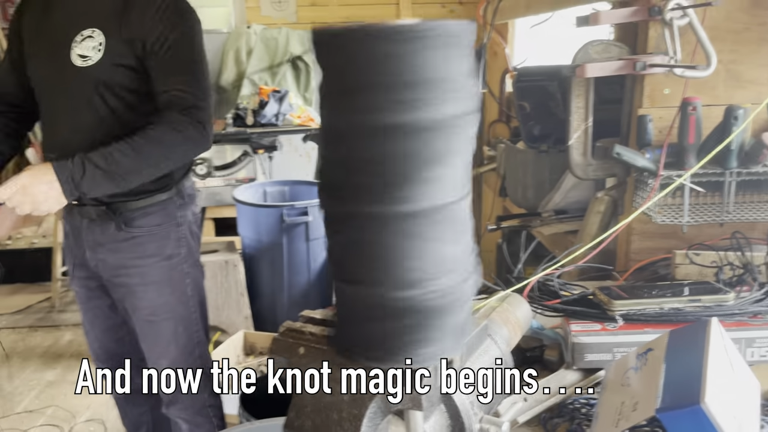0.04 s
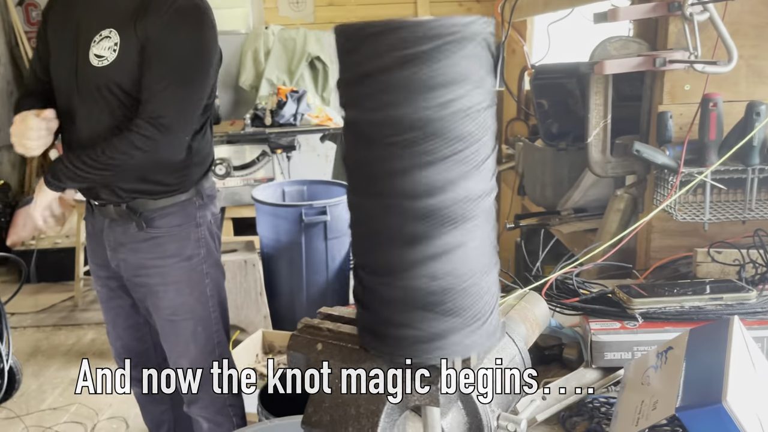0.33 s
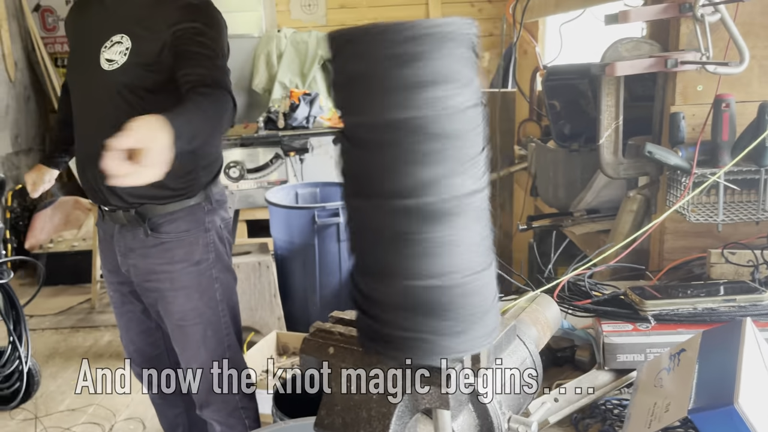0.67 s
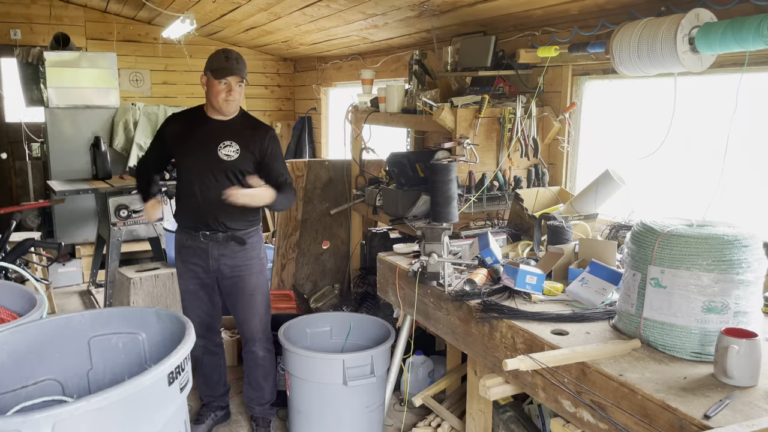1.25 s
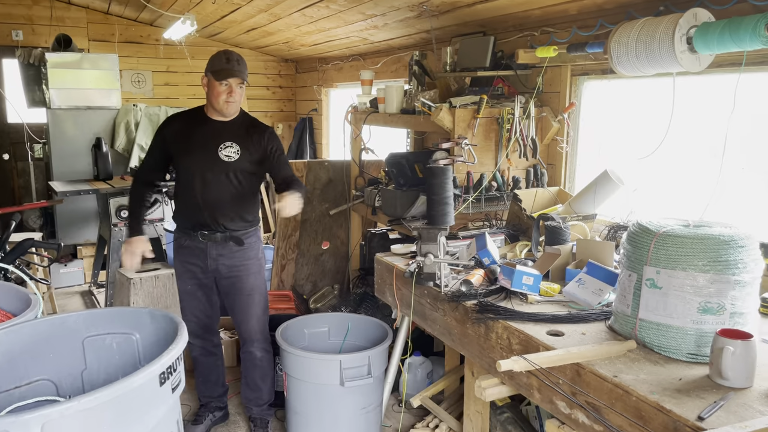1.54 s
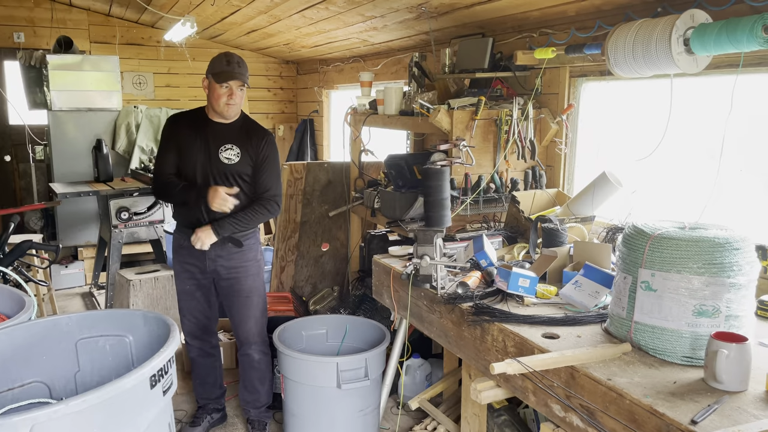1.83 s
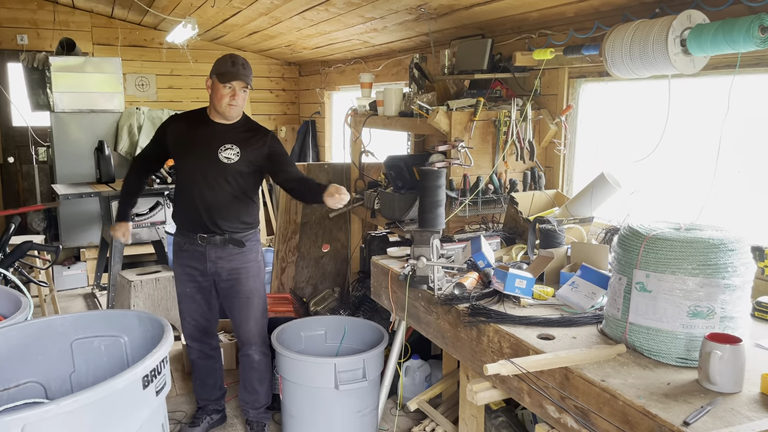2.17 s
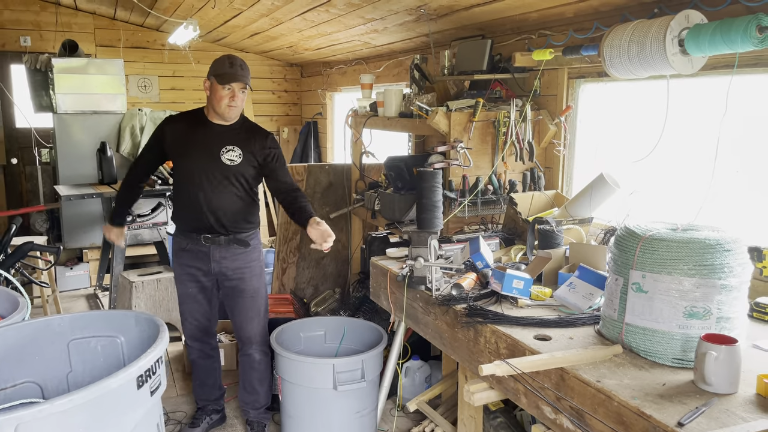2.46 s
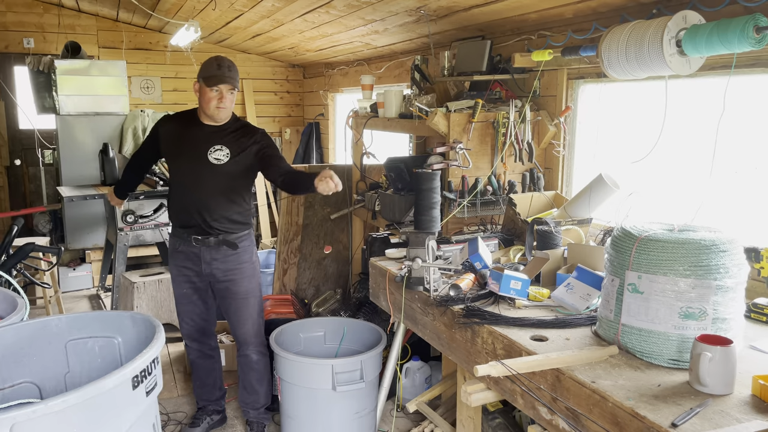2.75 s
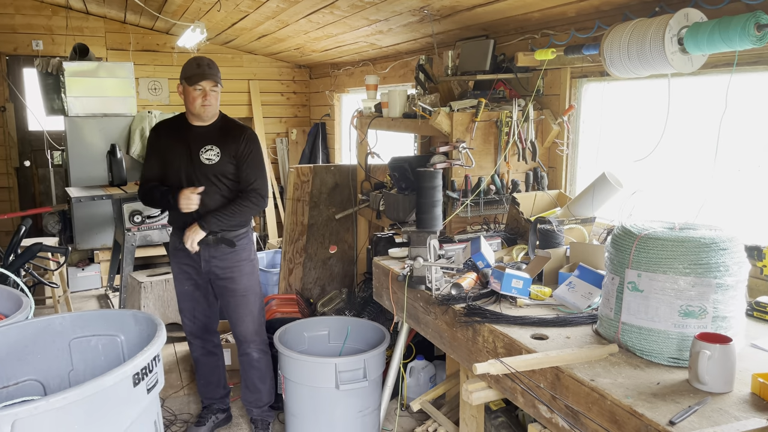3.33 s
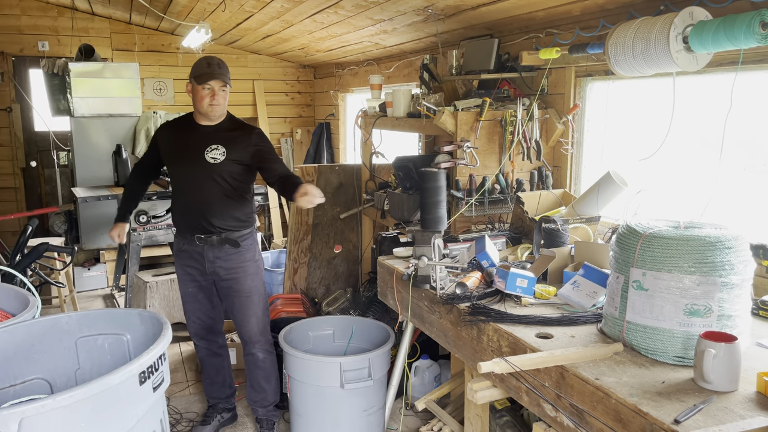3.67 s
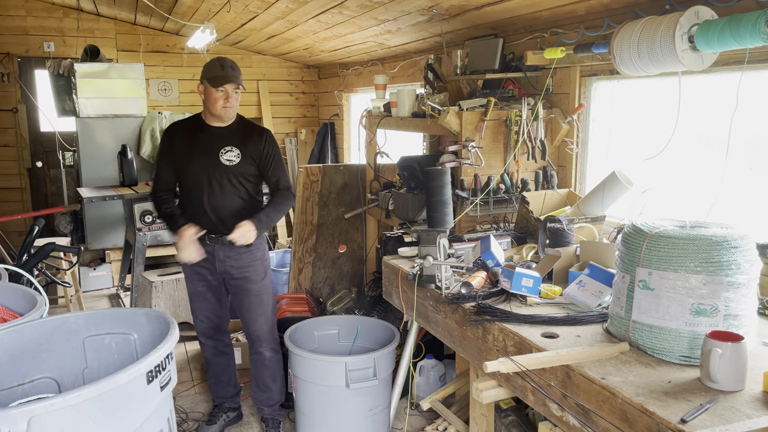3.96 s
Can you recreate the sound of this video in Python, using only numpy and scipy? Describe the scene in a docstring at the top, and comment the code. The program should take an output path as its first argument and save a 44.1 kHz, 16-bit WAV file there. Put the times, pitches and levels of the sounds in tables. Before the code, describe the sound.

A spool knocks and rattles unevenly on its spindle, over low workbench rumble and faintly hissing line. A loud, close slam with a metallic buzz and clink comes at 0.1 seconds, followed by knocks and ticks. From about 1.2 seconds the knocking is heard from across the small workshop. A knock with a buzzing scrape lands at 2.3 seconds; after a lull, knocks crowd together from 3 seconds with faint clinks.

```python
"""A tall spool wobbles on a spindle clamped to a wooden workbench as its line is pulled off by hand.
Its impacts excite the damped modes of spool and bench: it knocks, slams, rattles and scrapes, and the
bench rumbles in its lowest mode. Friction makes the running line hiss and tick, hard knocks set loose
metal buzzing, and a tool clinks. It is heard from beside the spool, then, after a short click, from
across the small workshop."""
import sys
import numpy as np
from scipy import signal
from scipy.io import wavfile
from scipy.ndimage import uniform_filter1d

SR = 44100
rng = np.random.default_rng(int(sys.argv[2]) if len(sys.argv) > 2 else 0)


def unload_wav(signal):
    """Save mono or channel-first audio to the path in sys.argv[1] as 16-bit WAV at rate SR, clipped to [-1, 1]."""
    wavfile.write(
        sys.argv[1],
        SR,
        np.round(np.clip(np.atleast_2d(signal).T, -1, 1) * 32767).astype(np.int16),
    )


N = 176400
TIME = np.arange(N) / SR
BAND_HZ = 80 * 2 ** (np.arange(24) / 3)
MOVE_S = 1.245  # the listening point changes from near to far

# The spool knocks on its spindle. Each row: start in seconds, boom, clunk and crack levels in dB,
# pitch of the hollow ring in Hz, contact time in seconds. Levels in all tables are relative.
KNOCKS = [(0.048, -35, -28, -39, 455, 0.00051), (0.09, -15, -14.5, -22, 446, 0.002),
          (0.161, -16.5, -15, -27.5, 630, 0.0052), (0.286, -21, -27, -37, 370, 0.013),
          (.398, -21.5, -22, -39, 525, 0.0012), (0.484, -30, -30.5, -34.5, 1000, 0.005),
          (.5215, -20.5, -17.5, -36.5, 690, 0.0026), (0.771, -27.5, -30.5, -44, 519, 0.00805),
          (1.013, -19.5, -26.5, -38.5, 427, 0.0063), (1.067, -30, -32, -52, 390, 0.0091),
          (1.115, -20, -35, -56, 545, 0.0023), (1.192, -20.5, -25.5, -37.5, 510, 0.0022),
          (1.387, -20.5, -22.5, -37, 549, 0.0053), (1.45, -27, -28, -71, 583, 0.01),
          (1.583, -27, -36.5, -45, 600, 0.0013), (1.623, -22, -25, -50, 603, 0.0041),
          (1.69, -29.5, -28, -70, 460, 0.0058), (1.759, -30, -33, -73, 427, 0.0069),
          (1.876, -29, -25.5, -59, 650, 0.02), (2.159, -30, -28.5, -41, 630, 0.0027),
          (2.273, -26, -24, -39, 488, 0.013), (2.325, -16.5, -24, -31.5, 300, 0.0096),
          (2.473, -41.5, -45, -46, 456, 0.0052), (2.675, -42, -44, -46, 490, 0.0073),
          (2.953, -24.5, -32, -75, 405, 0.011), (3.059, -25, -25, -38.5, 844, 0.0014),
          (3.085, -16, -20.5, -33.5, 604, 0.01205), (3.127, -23, -19.5, -39, 607, 0.0097),
          (3.225, -18, -21.5, -37, 497, 0.0026), (3.299, -24.5, -31, -55, 513, 0.0016),
          (3.384, -23, -25, -41, 506, 0.0023), (3.432, -20.5, -22, -42, 510, 0.015),
          (3.467, -18.5, -19.5, -36, 644, 0.002), (3.493, -20.5, -23, -43, 838, 0.0079),
          (3.585, -24.5, -31.5, -41, 387, 0.0061), (3.634, -23, -23, -38.5, 770, 0.0044),
          (3.712, -19, -19, -31, 520, 0.0058), (3.739, -17, -25, -50, 490, 0.0092),
          (3.92, -22.5, -32, -61, 460, 0.012), (3.974, -26, -33, -64, 447, 0.0086)]
BOOM_HZ, CLUNK_HZ, CRACK_HZ = 217, 520, 1400  # where the three levels apply
HARD_CONTACT_S = 0.00072  # shorter contacts give a full, sharp clack
# Modes of spool and bench. Each row: frequency in Hz, near level in dB, far level in dB, t60 in seconds.
WOOD_MODES = [(101.3, -1, -4.5, 0.16), (172, -4, -4.5, 0.11), (297.6, 6.5, 1.5, 0.17),
              (312, -2.5, -7, 0.17), (454, -6, -13, 0.1), (481, -3.5, -2.5, 0.15), (547, -11, -7.5, 0.094),
              (600, -3, -15, 0.03), (779, 1, -5.5, 0.07), (834, -7.5, -20, 0.18), (990, -21, -19, .08),
              (1153.5, -17, -10, 0.11), (1710, -5, -26, 0.1), (1864, 3.5, -9, 0.08),
              (2312, 3.5, -14.5, 0.041)]
MODE_SPREAD_DB = 2.5  # each blow strikes the modes a little differently
# Spectrum of the contact clack. Each row: frequency in Hz, band level in dB.
CLACK_SPECTRUM = [(300, -40), (520, -8), (780, 15.5), (1100, -27), (2200, 9), (3200, -45), (5500, -26),
                  (9000, -36), (14000, -35)]
# Dense ringing of bench, clutter and room. Each row: frequency in Hz, band level in dB.
CLATTER_SPECTRUM = [(90, -6.5), (160, -3.5), (240, -7.5), (330, -5.5), (500, -2.5), (750, -7.5), (1100, -4),
                    (2000, -9.5), (3500, -11), (7000, -14.5), (10000, -5.5), (13000, -42)]
# Decay of that ringing. Each row: frequency in Hz, nominal t60 in seconds.
CLATTER_DECAY = [(120, 0.24), (300, 0.22), (600, 0.23), (1500, 0.26), (8000, 0.19)]
# The spool slams on the bench and rebounds. Each row: start in seconds, level in dB, final pitch in Hz.
SLAM_BLOWS = [(.092, -0.5, 453), (.0968, -13.5, 613), (.1015, -25, 436), (.1068, -10, 305),
              (.1148, -10, 320)]
# Strength of the rattle at the spindle. Each row: time in seconds, level in dB.
RATTLE_LEVEL = [(0, -20.5), (.35, -31), (.56, -27), (.65, -31), (.92, -35), (1.1, -33.5), (1.3, -36),
                (1.5, -27), (1.72, -29), (2.08, -35.5), (2.4, -29), (2.6, -42.5), (2.85, -39), (3.02, -34),
                (3.15, -31.5), (3.6, -26.5), (3.85, -39), (4, -22)]
# The spool's rim scrapes. Each row: start in seconds, rise time in seconds, level in dB.
SCRAPES = [(2.333, 0.01, -26.5), (3.095, 0.027, -45), (3.713, .012, -38.5)]
# Spectrum of the scraping. Each row: frequency in Hz, band level in dB.
SCRAPE_SPECTRUM = [(200, -6), (300, -8), (450, -12), (700, -14), (1400, -22.5), (2400, -9.5), (3600, -19.5),
                   (5000, -9.5), (7000, -18), (10000, -21), (13000, -45)]
# Bench rumble heard near. Each row: time in seconds, frequency in Hz, level in dB.
RUMBLE_NEAR = [(0.0, 61.4, -14.5), (0.064, 64.15, -19), (0.226, 63, -19.5), (0.306, 63.8, -32),
               (0.33, 62.5, -25.5), (0.472, 67.3, -23), (0.61, 60.9, -29), (0.7, 72.6, -24.5),
               (0.738, 68.8, -17), (0.838, 68.4, -30.5), (0.856, 70.64, -44), (0.9, 71.4, -26),
               (1.05, 72.5, -23.5), (1.18, 66.8, -31.5), (1.214, 71.6, -16.5), (1.24, 68, -19)]
# Bench rumble heard far. Each row: time in seconds, level in dB.
RUMBLE_FAR = [(1.26, -38), (1.33, -31.5), (1.41, -25.5), (1.51, -22.5), (1.56, -35), (1.645, -27),
              (1.72, -29), (1.82, -45), (1.94, -23.5), (2, -36), (2.12, -40.5), (2.21, -22), (2.3, -30.5),
              (2.365, -23), (2.47, -30), (2.6, -41.5), (2.83, -37.5), (2.96, -26.5), (3.08, -27.5),
              (3.17, -21), (3.27, -22), (3.33, -28.5), (3.5, -25.5), (3.59, -34.5), (3.75, -21),
              (3.82, -31.5), (4, -23)]
# Strength of the running line's hiss. Each row: time in seconds, level in dB.
HISS_LEVEL = [(0.0, -44.5), (0.2, -46.5), (0.78, -47), (1.08, -48.5), (1.38, -46), (1.53, -49.5),
              (1.96, -48), (2.29, -49.5), (2.47, -50), (2.9, -48.5), (3.11, -47), (3.52, -47), (4.0, -48.5)]
# Spectrum of the hiss. Each row: frequency in Hz, band level in dB.
HISS_SPECTRUM = [(300, -35), (700, -17), (1300, -10), (2400, -8.5), (3500, -13), (5000, -12), (7000, -10),
                 (9000, -8.5), (11500, 0), (13000, -36), (15000, -48)]
# Short ticks: the one at 1.242 s is a click as the sound cuts from near to far; the rest are the line's.
# Each row: start in seconds, level in dB.
TICKS = [(0.029, -36), (0.078, -41), (0.1293, -18.5), (0.137, -19), (0.172, -33), (0.232, -44),
         (0.247, -32.5), (0.381, -36), (0.411, -29.5), (0.472, -29), (.489, -27.5), (0.517, -37),
         (0.564, -31), (0.626, -34), (0.641, -41), (.673, -45), (0.712, -39), (.717, -39), (0.732, -60),
         (0.904, -40.5), (0.932, -39), (.949, -37), (0.956, -57), (0.977, -34), (1.0, -46), (1.009, -50),
         (1.031, -41), (1.051, -41), (1.085, -43), (1.104, -44), (1.118, -39), (1.13, -34.5), (1.157, -48),
         (1.193, -55), (1.207, -54), (1.242, -47), (1.829, -43.5), (2.086, -43.5), (2.97, -43),
         (3.653, -48), (3.931, -37)]
# Spectrum of a tick. Each row: frequency in Hz, band level in dB.
TICK_SPECTRUM = [(1200, -31), (3000, -17), (5000, -4.5), (7000, -13), (9000, -1), (11500, 10), (15000, -24)]
# Loose metal buzzes after hard knocks. Each row: start in seconds, level in dB.
BUZZES = [(.096, -23.5), (2.329, -28), (2.338, -25), (3.711, -35.5)]
# Modes of the loose metal. Each row: frequency in Hz, level in dB, t60 in seconds.
METAL_MODES = [(5000, -18, .1), (8260, -9, 0.23), (8280, -1.5, 0.15), (8430, 7, 0.055), (8830, 1.5, 0.04),
               (9050, 0.5, 0.062)]
# A tool clinks on the bench. Each row: start in seconds, level in dB.
CLINKS = [(0.1303, -23.5), (3.113, -45), (3.182, -48.5), (3.386, -43.5), (3.448, -46), (3.476, -58),
          (3.653, -39.5), (3.746, -40)]
# Modes of the tool. Each row: frequency in Hz, level in dB, t60 in seconds.
TOOL_MODES = [(2800, 1.5, 0.026), (3050, 1, .04), (4050, -5, 0.15), (3950, -8, 0.039), (5200, -9, 0.05),
              (6320, -4, 0.037)]
# Reflections off clutter and walls. Each row: delay in seconds, gain as a ratio.
ECHOES = [(.0031, 0.12), (.0057, -0.1), (.0089, -0.045), (0.0135, -0.079), (0.0221, 0.0051)]
# Likeness of left and right. Each row: frequency in Hz, correlation coefficient.
COHERENCE = [(60, 0.72), (120, 1), (380, 0.76), (700, 0.59), (1300, 0.2), (4400, 0.34), (7000, 0.29),
             (8800, 0.36), (12000, 0.28)]


def knocks(rows, bands, near, blow_db, clack_db, hollow_t60, modes_db, clatter_db, decay_scale):
    """Impact excitation: wood rings and clatters; longer contact weakens the hollow blow and the clack."""
    starts, _, clunk_db, _, hollow_hz, contact_s = rows.T
    contact_s = np.maximum(contact_s, 1 / SR)
    soft_db = -10 * np.log10(1 + contact_s / HARD_CONTACT_S)
    out = np.zeros((2, N))
    for start, db, hz in zip(starts, clunk_db + soft_db + blow_db, hollow_hz):
        out += ring(impulses(np.array([start]), from_db([db])), hz, hollow_t60)
    for k, (hz, near_db, far_db, t60) in enumerate(WOOD_MODES):
        db = knock_db(rows, hz) + (near_db if near else far_db) + modes_db
        heights = from_db(db + rng.normal(0, MODE_SPREAD_DB, len(rows)))
        strikes = impulses(starts + contact_s * rng.random(len(rows)), heights)
        out += (-1) ** k * ring(strikes, hz, t60)
    return out + clatter(rows, bands, contact_s, soft_db, clack_db, clatter_db, decay_scale)


def clatter(rows, bands, contact_s, soft_db, clack_db, clatter_db, decay_scale, build_cycles=1.63):
    """Modal overlap: after each clack, crowded modes swell and decay as noise, low bands swelling last."""
    age = TIME[:SR // 2]
    out = np.zeros((2, N))
    for hz, band in zip(BAND_HZ, bands):
        t60 = decay_scale * at_hz(CLATTER_DECAY, hz)
        tail = from_db(at_hz(CLATTER_SPECTRUM, hz) + clatter_db) ** 2 * np.exp(-2 * np.log(1000) * age / t60)
        clack = from_db(at_hz(CLACK_SPECTRUM, hz) + clack_db) ** 2 * np.exp(-age / 0.0006)
        power = np.zeros(N + len(age))
        for start, contact, db, soft in zip(rows[:, 0], contact_s, knock_db(rows, hz), soft_db):
            swell = 1 - np.exp(-age / (contact + build_cycles / hz))
            burst = tail * swell + clack * from_db(soft) ** 2
            power[int(start * SR):][:len(age)] += from_db(db) ** 2 * burst
        out += band * np.sqrt(power[:N])
    return out


def knock_db(rows, hz):
    """Excitation spectrum: the level of each knock at one frequency."""
    return np.array([at_hz([(BOOM_HZ, boom), (CLUNK_HZ, clunk), (CRACK_HZ, crack)], hz)
                     for boom, clunk, crack in rows[:, 1:4]])


def slam(lead_hz=810, sweep_s=0.00094, first_t60=0.039, rebound_t60=0.018):
    """Dispersion: treble runs ahead through the bent board, so the blow and its rebounds drop in pitch."""
    out = np.zeros(N)
    for k, (start, db, hz) in enumerate(SLAM_BLOWS):
        age = np.maximum(TIME - start, 0)
        cycles = hz * age + lead_hz * sweep_s * (1 - np.exp(-age / sweep_s))
        decay = np.exp(-np.log(1000) * age / (rebound_t60 if k else first_t60))
        out -= from_db(db) * np.sin(2 * np.pi * cycles) * decay
    return out


def rattle(bands, tilt_db_per_octave=-7.5):
    """Random excitation: small contacts at the spindle keep the wood ringing, duller than the knocks."""
    def dull_db(hz):
        return tilt_db_per_octave * np.maximum(np.log2(hz / BOOM_HZ), 0)

    contacts = grains(per_s=140, spread_db=7.5)
    wood = sum((-1) ** k * from_db(db + dull_db(hz)) * ring(contacts, hz, t60)
               for k, (hz, _, db, t60) in enumerate(WOOD_MODES))
    wash = sum(band * from_db(at_hz(CLATTER_SPECTRUM, hz) + dull_db(hz))
               for hz, band in zip(BAND_HZ, bands))
    level = from_db(in_time(RATTLE_LEVEL)[0])
    return level * (from_db(-6.5) * unit_rms(wood) + from_db(-3) * unit_rms(wash))


def scrapes(bands, slip_s=0.0014, wood_db=-5):
    """Stick-slip friction: the rim rubs in tiny slips, each a puff of grit and a push on the wood."""
    pressure = np.zeros(N)
    for start, rise_s, db in SCRAPES:
        progress = np.maximum(TIME - start, 0) / rise_s
        pressure += from_db(db) * progress * np.exp(1 - progress)
    slips = grains(per_s=700, spread_db=3.5)
    slip_power = signal.lfilter([1], [1, -np.exp(-1 / (slip_s * SR))], slips ** 2)
    grit = sum(band * from_db(at_hz(SCRAPE_SPECTRUM, hz)) for hz, band in zip(BAND_HZ, bands))
    wood = sum(from_db(db + wood_db) * ring(slips * pressure, hz, t60) for hz, _, db, t60 in WOOD_MODES)
    return pressure * unit_rms(np.sqrt(slip_power)) * grit + wood


def bench_rumble(hz, db, wander_hz, flutter_db, shudder_db):
    """Forced vibration: the bench's lowest mode is shaken unevenly, with a looser shudder beneath it."""
    phase = 2 * np.pi * np.cumsum(hz + wander_hz * drift(rate_hz=16.8)) / SR
    shudder = unit_rms(bandpass(rng.standard_normal(N + SR), 51, 62)[SR:])
    mode = np.sqrt(2) * np.sin(phase) * from_db(flutter_db * drift(rate_hz=39))
    return (mode + from_db(shudder_db) * shudder) * from_db(db)


def running_line(bands, near, far_dull_db=-3, near_rustle_db=-6, far_rustle_db=-17, bunch_db=3):
    """Friction noise: the line hisses, ticks and rustles in bunches; one click marks the cut to far."""
    starts, db = np.transpose(TICKS)
    ticks = hit_envelope(starts, db, t60=0.018, rise_s=0.00032)
    ticks += hit_envelope(starts, db - 15.5, t60=0.11, rise_s=0.0037)  # faint tails
    run = from_db(in_time(HISS_LEVEL)[0])
    hiss = run * from_db(2 + drift(rate_hz=20))
    dulled = hiss * from_db(np.where(near, 0, far_dull_db))
    out = np.zeros((2, N))
    for hz, band in zip(BAND_HZ, bands):
        out += band * (dulled if hz > 9000 else hiss) * from_db(at_hz(HISS_SPECTRUM, hz))
        if hz > 1000:
            out += band * ticks * from_db(at_hz(TICK_SPECTRUM, hz))
    centre = grains(per_s=1400, spread_db=7)
    sides = np.array([grains(per_s=1400, spread_db=6.5) for _ in range(2)])
    fibres = echoed(centre + sides) * from_db(bunch_db * drift(rate_hz=35))
    rustle = unit_rms(bandpass(fibres, 2500, 10500))
    return out + rustle * run * from_db(np.where(near, near_rustle_db, far_rustle_db))


def loose_metal():
    """Contact chatter: a shaken metal part strikes rapidly for a moment and rings in its high modes."""
    shaken = hit_envelope(*np.transpose(BUZZES), t60=0.062, rise_s=0.0013)
    chatter = [grains(per_s=1500, spread_db=5) * shaken for _ in range(2)]
    mid, side = sum(from_db(db - 25) * ring(chatter, hz, t60) for hz, db, t60 in METAL_MODES)
    return mid + from_db(-10) * side * np.array([[1], [-1]])


def tool_clinks(max_bounce_s=0.012, bounce_loss_db=18):
    """Free vibration: a tool rings after each touch of metal on metal and its two quick bounces."""
    touches = [(start + k * max_bounce_s * rng.uniform(0.25, 0.99), db - k * bounce_loss_db)
               for start, db in CLINKS for k in range(3)]
    starts, db = np.transpose(touches)
    out = np.zeros(N)
    for hz, mode_db, t60 in TOOL_MODES:
        heights = from_db(db + mode_db + rng.normal(0, MODE_SPREAD_DB, len(starts)))
        out += ring(impulses(starts, heights), hz, t60)
    return out


def echoed(x):
    """Early reflections: the workshop adds weak, delayed copies of a sound."""
    out = x.copy()
    for delay_s, gain in ECHOES:
        lag = max(int(delay_s * SR), 1)
        out[..., lag:] += gain * x[..., :-lag]
    return out


def noise_bands():
    """Partial coherence: third-octave bands of noise of rms 1, partly alike in left and right."""
    white, bands = echoed(rng.standard_normal((2, 2, N))), []
    for k, hz in enumerate(BAND_HZ):
        mid, side = bandpass(white[k % 2], hz / 1.13, hz * 1.13)  # adjacent bands are independent
        alike = np.clip(at_hz(COHERENCE, hz), -1, 1)
        bands.append(unit_rms(np.sqrt(1 + alike) * mid + np.sqrt(1 - alike) * side * [[1], [-1]]))
    return bands


def ring(x, hz, t60):
    """Damped resonator: a unit impulse starts a decaying sine of height 1."""
    r, w = np.exp(-np.log(1000) / (t60 * SR)), 2 * np.pi * hz / SR
    return signal.lfilter([0, np.sin(w)], [1, -2 * r * np.cos(w), r * r], x)


def hit_envelope(starts, db, t60, rise_s):
    """Exponential decay: the amplitude of hits whose energy swells and dies away."""
    fall, rise = np.exp(-2 * np.log(1000) / (t60 * SR)), np.exp(-1 / (rise_s * SR))
    energy = signal.lfilter([1], [1, -fall], impulses(starts, from_db(db) ** 2))
    return np.sqrt(signal.lfilter([1 - rise], [1, -rise], energy))


def impulses(starts, heights):
    """Impulse train: one click at each start."""
    return np.bincount(np.clip(starts * SR, 0, N - 1).astype(int), heights, N) + 1e-18


def grains(per_s, spread_db):
    """Shot noise: random clicks of uneven size and sign."""
    sizes = from_db(spread_db * np.minimum(rng.exponential(1, N), 4)) * rng.choice([-1, 1], N)
    return sizes * (rng.random(N) < per_s / SR) + 1e-18


def drift(rate_hz, step=40):
    """Low-passed noise: a slow fluctuation of rms 1."""
    r = np.exp(-2 * np.pi * rate_hz * step / SR)
    slow = signal.lfilter([1], [1, -2 * r, r * r], rng.standard_normal(N // step + 2002))[2000:]
    return np.interp(np.arange(N) / step, np.arange(len(slow)), unit_rms(slow))


def bandpass(x, low_hz, high_hz):
    """Band-pass filter."""
    return signal.sosfilt(signal.butter(2, [low_hz, high_hz], "band", fs=SR, output="sos"), x)


def bell(x, hz, db, q):
    """Resonant peak or dip."""
    a, w = from_db(db / 2), 2 * np.pi * hz / SR
    k = np.sin(w) / (2 * q)
    return signal.lfilter([1 + k * a, -2 * np.cos(w), 1 - k * a], [1 + k / a, -2 * np.cos(w), 1 - k / a], x)


def in_time(rows):
    """Linear interpolation of each column, sample by sample."""
    times, *columns = np.transpose(rows)
    return [np.interp(TIME, times, column) for column in columns]


def at_hz(points, hz):
    """Interpolation on a log-frequency axis."""
    frequencies, values = np.transpose(points)
    return np.interp(np.log(hz), np.log(frequencies), values)


def from_db(db):
    """Decibels to amplitude ratio."""
    return 10 ** (np.asarray(db) / 20)


def unit_rms(x):
    """Normalisation to rms 1."""
    return x / np.sqrt(np.mean(x ** 2) + 1e-20)


def scene():
    """Superposition: spool, bench, line and metal add together, heard near and then far."""
    near, rows, knock_bands = TIME < MOVE_S, np.array(KNOCKS), noise_bands()
    nearness = uniform_filter1d(near * 1.0, size=400)
    close = knocks(rows[rows[:, 0] < MOVE_S], knock_bands, near=True, blow_db=7, clack_db=-1,
                   hollow_t60=0.04, modes_db=-7, clatter_db=-1, decay_scale=0.94)
    distant = knocks(rows[rows[:, 0] > MOVE_S], knock_bands, near=False, blow_db=8, clack_db=-3.5,
                     hollow_t60=0.086, modes_db=-3, clatter_db=0.5, decay_scale=0.98)
    near_rumble = bench_rumble(*in_time(RUMBLE_NEAR), wander_hz=4.9, flutter_db=1.9, shudder_db=-5)
    far_rumble = bench_rumble(hz=73, db=in_time(RUMBLE_FAR)[0] - 1, wander_hz=6.05,
                              flutter_db=0, shudder_db=-3)
    rumble = nearness * near_rumble + (1 - nearness) * far_rumble
    bands = noise_bands()
    spool = nearness * close + slam() + distant + scrapes(bands) + rattle(bands)
    lean_left = from_db(0.87 * np.array([[0.5], [-0.5]]))
    return rumble + lean_left * (spool + running_line(bands, near) + loose_metal() + tool_clinks())


def record(dry):
    """Resonance and interference: the microphone ports ring near 9 kHz and oppose near 10 kHz."""
    mid = bell((dry[0] + dry[1]) / 2, hz=8800, db=7.5, q=3.34)
    mid = bell(mid, hz=10170, db=-23.5, q=39)
    side = bell((dry[0] - dry[1]) / 2, hz=10230, db=17.5, q=6.9)
    side = bell(side, hz=12600, db=-2, q=6.9)
    x = bell(np.array([mid + side, mid - side]), hz=13080, db=-30, q=2.97)
    x = signal.sosfilt(signal.butter(2, 28, "high", fs=SR, output="sos"), x)
    x = x / (1 + (x / 0.92) ** 6) ** (1 / 6)  # the highest peaks are rounded
    return signal.sosfilt(signal.ellip(10, 0.3, 80, 16200, "low", fs=SR, output="sos"), x)


dry = scene()
out = record(dry)
unload_wav(out)
```